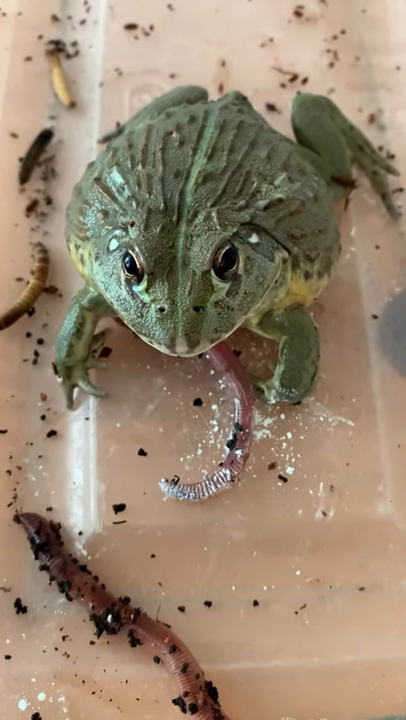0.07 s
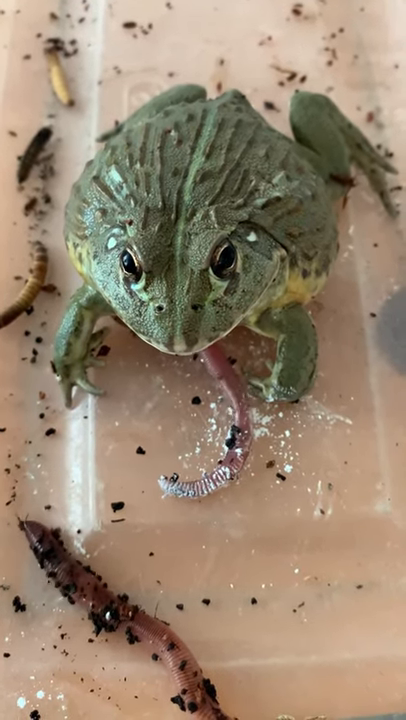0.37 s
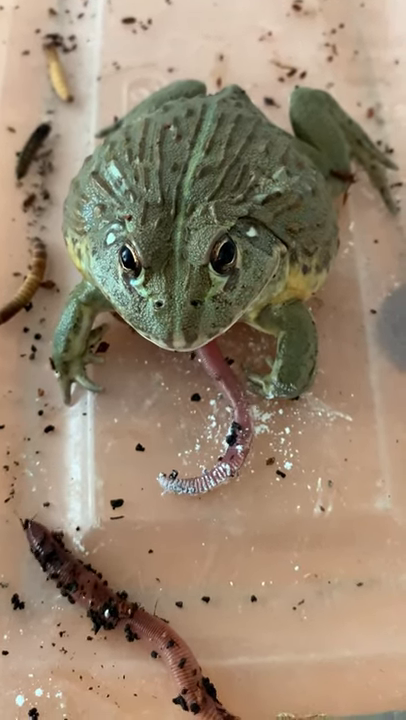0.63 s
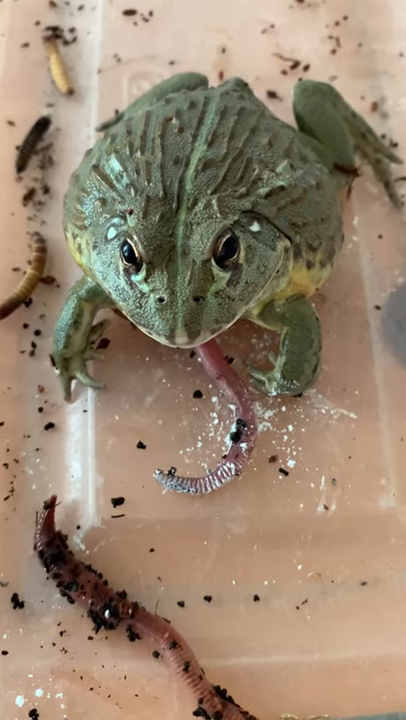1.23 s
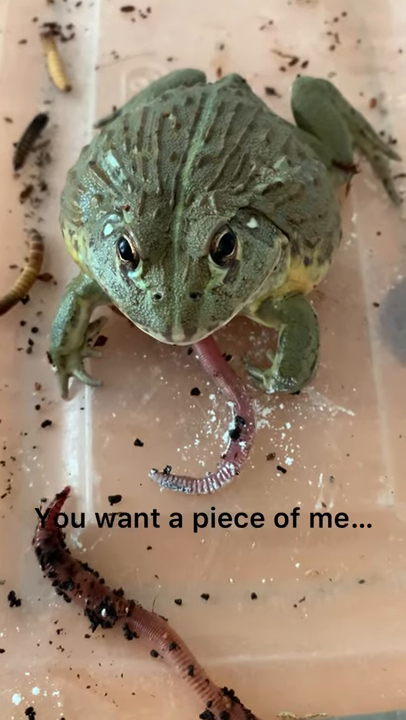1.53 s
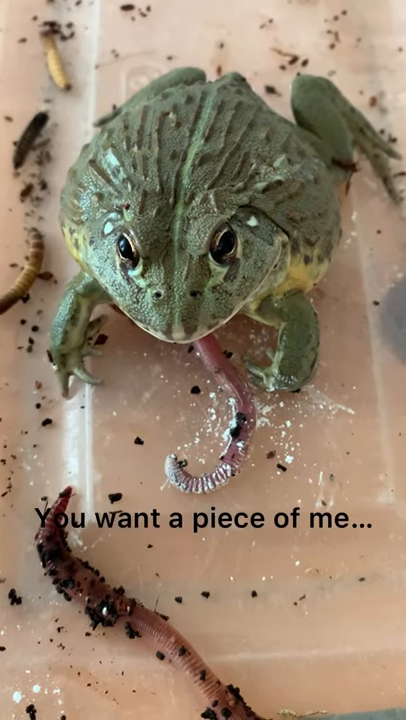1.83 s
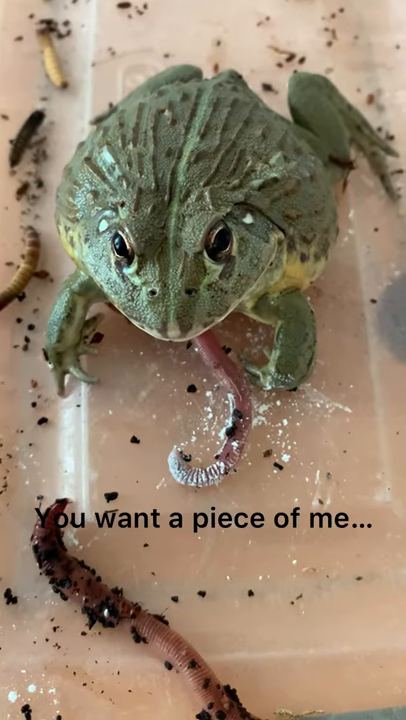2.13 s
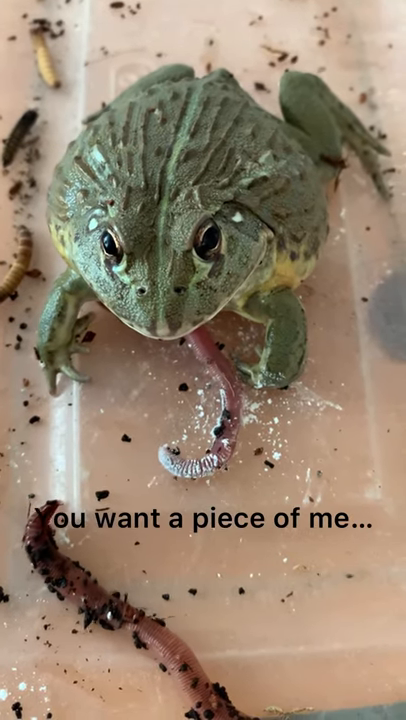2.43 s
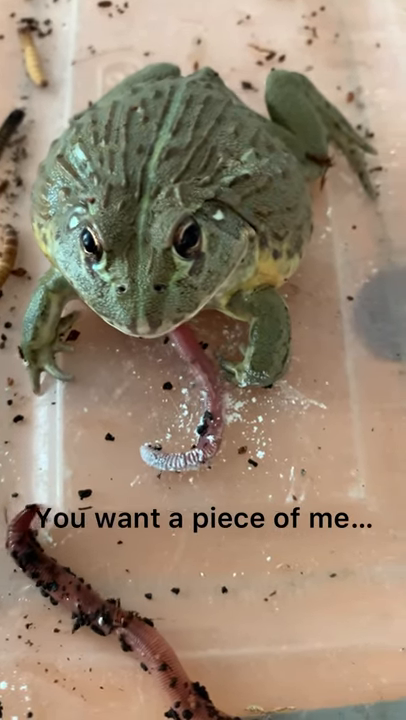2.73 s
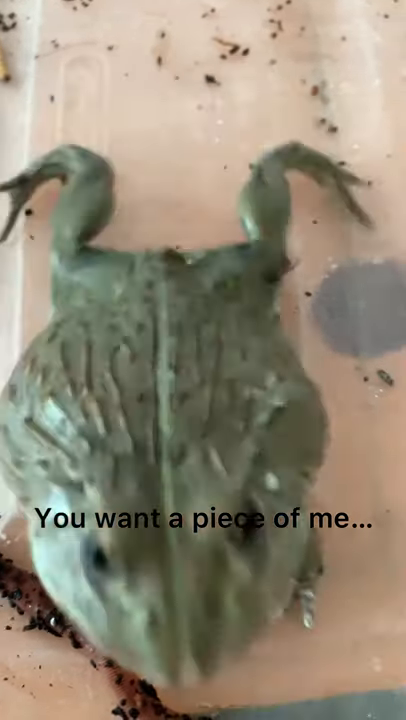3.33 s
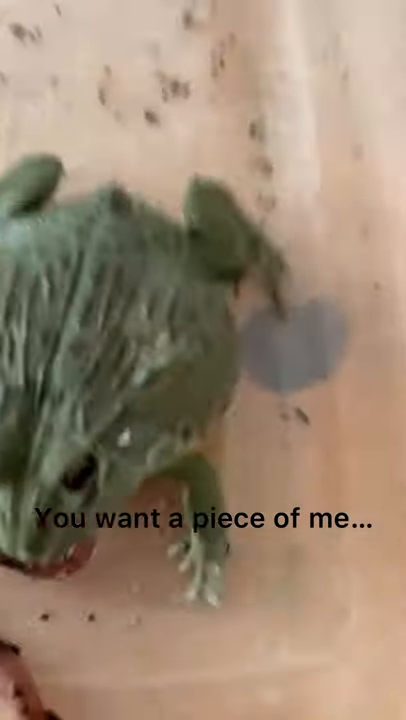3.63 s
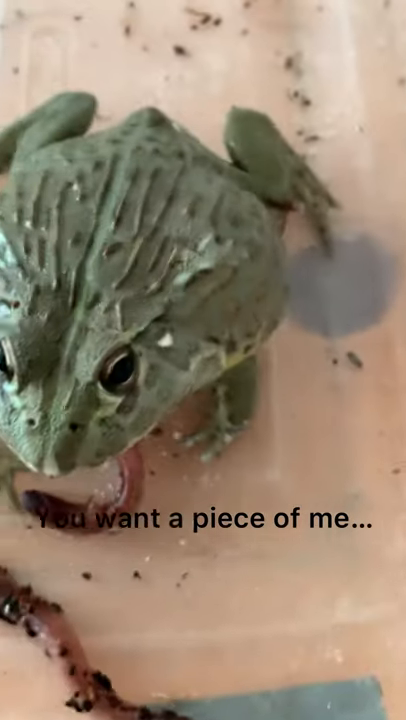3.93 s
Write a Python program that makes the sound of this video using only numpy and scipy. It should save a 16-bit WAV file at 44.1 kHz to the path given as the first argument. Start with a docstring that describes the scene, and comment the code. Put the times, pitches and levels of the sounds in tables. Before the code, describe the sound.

A frog lunges twice in a thin plastic tub, heard close up. Low room hum and faint rustles come first, then wet mouth clicks, two slapping, hollow thumps and skin scuffing over the damp floor.

```python
"""Frog lunging in a plastic tub

A big frog lunges twice in a thin tub, close up, in a quiet humming room. Soft rustles and small
squeaks come first. Its wet mouth clicks open, its body slaps the plastic and the tub floor booms and
rebounds under the weight. Around the blows, skin scuffs over the damp floor and peels off it."""
import sys
import numpy as np
from scipy import signal
from scipy.fft import rfft, irfft
from scipy.io import wavfile
from scipy.ndimage import uniform_filter1d

SR = 44100
rng = np.random.default_rng(int(sys.argv[2]) if len(sys.argv) > 2 else 0)


def master(y):
    """Save y as 16-bit WAV."""
    cut = np.clip(np.atleast_2d(y).T, -1, 1)
    pcm = np.round(cut * 32767)  # scale
    wavfile.write(sys.argv[1], SR, pcm.astype(np.int16))


N = 176400
T = np.arange(N) / SR
HZ = np.fft.rfftfreq(N, 1 / SR)


def amp(db):
    """Decibels to gain."""
    return 10 ** (np.asarray(db) / 20)


def unit_rms(x):
    """Scales to rms 1."""
    return x / np.sqrt(np.mean(x ** 2) + 1e-20)


def curve(points, hz=HZ):
    """Reads breakpoints on a log-frequency axis."""
    f, value = np.transpose(points)
    return np.interp(np.log(hz + 1), np.log(f + 1), value)


def noise(eq, grain_db=0):
    """Two unrelated EQ'd noises, optionally grainy; a fine random ripple gives a faintly tonal colour."""
    grain_gain = amp(grain_db * np.minimum(rng.exponential(1, N // 16 + 1), 5))
    grains = rng.standard_normal((2, N)) * grain_gain.repeat(16)[:N]
    ripple_axis = np.log1p(HZ / 1500) * 1500 / 27.99  # steps of about 28 Hz, wider in the treble
    ripple = np.interp(ripple_axis, np.arange(400), np.diff(rng.uniform(-1.5, 1.5, 401)))
    ripple_db = 3 * ripple * np.minimum(HZ / 600, 1)
    return unit_rms(irfft(rfft(grains) * amp(curve(eq) + ripple_db), N))


def swell(t, attack, decay):
    """Smooth attack, then exponential decay."""
    return np.sin(np.pi / 2 * np.clip(t / attack, 0, 1)) ** 2 * np.exp(-np.maximum(t - attack, 0) / decay)


def add(mix, start, sound):
    """Lays a sound into the mix at a time in seconds."""
    part = mix[..., round(start * SR):][..., :sound.shape[-1]]
    part += sound[..., :part.shape[-1]]


def pan(x, lag_ms, left_db):
    """Places a mono sound by shifting and trimming the left channel."""
    return np.array([amp(left_db) * np.interp(T - lag_ms / 1000, T, x), x])


def minimum_phase(gain):
    """Gives a gain curve the phase of something struck: it rings only after the blow."""
    cepstrum = irfft(np.log(gain + 1e-6), N)
    fold = np.r_[1, np.full(N // 2 - 1, 2), np.zeros(N // 2)]
    return np.exp(rfft(cepstrum * fold))


# Ventilation EQ: f/Hz, gain/dB
VENT_EQ = [(20, -18), (52, 5), (105, -3.5), (280, -2.5), (600, -2.5), (790, -5.5), (950, -20),
           (1300, -15.5), (1550, -22.5), (1830, -15.5), (2100, -25), (3300, -30), (5300, -41.5),
           (9500, -38.5), (16000, -64)]
# Stereo image of the air, centred in the lows: f/Hz, left-right correlation
VENT_CORRELATION = [(60, 0.96), (300, 0.82), (640, 0)]
# Machine hum: start t/s, end t/s, f/Hz, level/dB
MACHINE_HUMS = [(0, 0.397, 61.1, -64), (2.328, 3.114, 83.05, -60.5)]

def room_tone():
    """A steady bed of ventilation noise, with a faint machine hum that comes and goes."""
    shared, side = rfft(noise(VENT_EQ))
    same = np.clip(curve(VENT_CORRELATION), -1, 1)
    air = irfft(np.array([shared * amp(-1.3), same * shared + np.sqrt(1 - same ** 2) * side]), N)
    hum = np.zeros(N)
    for start, end, hz, db in MACHINE_HUMS:
        gate = np.clip(np.minimum(T - start, end - T) / 0.017, 0, 1)
        hum += amp(db) * np.sqrt(2) * np.sin(2 * np.pi * hz * T) * gate
    return amp(-54.5) * air + hum


# Dry rub EQ: f/Hz, gain/dB
RUB_EQ = [(200, 0), (3000, 9.5), (4300, 13), (5100, -1.5), (7500, -1), (10500, -23), (16000, -50)]
# Wet-film fizz EQ, shared with the scuffs: f/Hz, gain/dB
FIZZ_EQ = [(1500, -23), (4000, 4.5), (5400, 0), (7500, 7.5), (11500, -13.5), (16000, -10)]
# Soft strokes: t/s, attack/s, rub level/dB, fizz level/dB
RUSTLE_CUES = [(.06, 0.01, -70, -76), (1.785, 0.026, -88, -72.5), (1.88, 0.064, -67, -70.5),
               (2.12, 0.047, -66.5, -66), (2.415, 0.03, -74.5, -75), (2.55, 0.038, -68.5, -76.5),
               (3.018, 0.017, -51, -76)]

def rustles():
    """Faint rubbing before the lunge, each stroke with its own share of damp fizz."""
    rub, fizz = noise(RUB_EQ), noise(FIZZ_EQ, grain_db=2)
    return sum(swell(T - start, attack, decay=0.061) * (amp(rub_db) * rub + amp(fizz_db) * fizz)
               for start, attack, rub_db, fizz_db in RUSTLE_CUES)


# Small skin slips: t/s, length/s, f/Hz, level/dB
SQUEAK_CUES = [(0.447, 0.13, 3800, -68), (2.323, 0.033, 357, -45.5), (3.523, 0.023, 1294, -49)]

def squeaks():
    """Wet skin slips on the plastic in brief raspy tones whose pitch jitters every few cycles."""
    out = np.zeros(N)
    for start, length, hz, db in SQUEAK_CUES:
        t = np.arange(0, length, 1 / SR)
        jitter = unit_rms(uniform_filter1d(rng.standard_normal(SR // 2), size=round(2 * SR / hz)))
        pitch = hz * (1 + 0.075 * jitter[:len(t)])
        envelope = np.sin(np.pi * t / length) ** 2
        add(out, start, amp(db) * envelope * np.sin(2 * np.pi * np.cumsum(pitch) / SR))
    return pan(out, lag_ms=0.055, left_db=-4.0)


# Dull body of rubbed plastic: f/Hz, gain/dB
SCUFF_EQ = [(200, 6), (1250, -9.5), (2400, -12), (4200, -33), (5500, -58)]
# Resonances of rubbed plastic: f/Hz, width/Hz, gain/dB
RING_MODES = [(489, 29, 9), (1987, 55, -2), (3120, 150, -11.5), (4040, 310, -11)]
# The rings bend as the pressure on the plastic shifts: t/s, pitch ratio
RING_BEND = [(3.73, 0.98), (3.81, 0.97), (3.93, 1.025)]
# Slides on the damp floor: t/s, attack/s, decay/s, level/dB, fizz trim/dB, ring trim/dB
SCUFF_CUES = [(3.158, 0.041, 0.042, -42, -5.5, -19), (3.248, 0.091, 0.013, -41, -17, -29),
              (3.329, 0.02, 0.046, -43.5, 4.5, -14.5), (3.516, 0.06, 0.091, -53, 3.5, -10),
              (3.7, 0.044, 0.028, -37, -4.5, -6.5), (3.76, 0.0096, 0.39, -53, -30, -5.5),
              (3.887, 0.076, 0.45, -47, 0, -3)]

def scuffs():
    """Grainy sliding skin: a dull body and wavering rings from the plastic, a fizz from the wet film."""
    body = noise(SCUFF_EQ, grain_db=2)
    body = (body + 0.24 * body[::-1]) * amp([[-3], [0]])  # narrowed, leaning right
    fizz = amp(-12) * noise(FIZZ_EQ, grain_db=2)
    modes = sum(amp(db) / (1 + (2 * (HZ - hz) / width) ** 2) for hz, width, db in RING_MODES)
    steady_rings = irfft(rfft(rng.standard_normal((2, N))) * modes, N)
    varispeed = np.cumsum(np.interp(T, *np.transpose(RING_BEND))) / SR
    rings = unit_rms(np.array([np.interp(varispeed % T[-1], T, side) for side in steady_rings]))
    return sum(amp(db) * swell(T - start, attack, decay)
               * (body + amp(fizz_db) * fizz + amp(ring_db) * rings)
               for start, attack, decay, db, fizz_db, ring_db in SCUFF_CUES)


# Sticky crackle EQ: f/Hz, gain/dB
CRACKLE_EQ = [(700, -60), (1250, 3.5), (1600, -6), (2600, -2.5), (3600, -14), (12000, -32)]
# Skin lifting off the floor: t/s, attack/s, decay/s, level/dB
PEEL_CUES = [(3.17, 0.039, 0.019, -47), (3.251, 0.019, 0.013, -41.5), (3.34, 0.03, 0.0044, -43)]

def peeling(snaps_per_s=1000):
    """Many tiny sticky contacts let go one by one."""
    snaps = rng.standard_normal(N) * (rng.random(N) < snaps_per_s / SR)
    crackle = unit_rms(irfft(rfft(snaps) * amp(curve(CRACKLE_EQ)), N))
    envelope = sum(amp(db) * swell(T - start, attack, decay) for start, attack, decay, db in PEEL_CUES)
    return pan(crackle * envelope, lag_ms=0.099, left_db=-7.0)


# Bright click EQ: f/Hz, gain/dB
CLICK_EQ = [(2000, 2), (5000, -5), (7000, -3.5), (15000, 1.5)]
# Mouth, tongue and skin clicks: t/s, level/dB, decay/s, low-pass f/Hz
CLICK_CUES = [(3.2123, -31, 0.0032, 16400), (3.222, -43, 0.0096, 15800), (3.242, -41.5, 0.004, 12000),
              (3.3276, -33, 0.0031, 16000), (3.3323, -31.5, 0.0014, 4050), (3.39, -38, 0.0017, 5000),
              (3.461, -52, 0.01, 10700), (3.503, -40, 0.0014, 5700), (3.552, -53, 0.0073, 6760),
              (3.687, -26, 0.0053, 6700)]

def wet_clicks():
    """Wet skin snaps free in bright cracks with a hard attack and a tight tail."""
    crack = noise(CLICK_EQ)
    spectrum = 0
    for start, db, decay, cutoff in CLICK_CUES:
        envelope = amp(db) * (T > start) * np.exp(-((T - start) / decay) ** 2)
        low_pass = 1 / (1 + 1j * np.sqrt(2) * HZ / cutoff - (HZ / cutoff) ** 2)
        spectrum += rfft(envelope * crack) * low_pass
    mid, side = irfft(spectrum, N)
    return pan(mid, lag_ms=-0.12, left_db=-1) + 0.073 * np.array([side, -side])


# Tub wall modes: f/Hz, gain/dB, t60/s
WALL_RINGS = [(181.4, -8.5, 0.081), (304, -13.5, 0.051), (350.6, -12.5, 0.052), (480, -10.5, 0.076),
              (530.6, -16.5, 0.082), (887, -0.5, 0.013), (1030, 0.5, 0.0055), (1130, -13.5, 0.021),
              (1310, -13.5, 0.036), (1450, -18, 0.034), (1685, -9, 0.015), (1815, -23, 0.082),
              (2210, -20, 0.025), (3170, -6, 0.002)]
# Left-channel EQ of the walls: f/Hz, gain/dB
WALL_LEFT_EQ = [(330, -2), (1200, -7)]
# Skin hits on the plastic: t/s, level/dB, low-pass f/Hz
SLAP_CUES = [(3.256, -33, 1500), (3.3277, -15.5, 250), (3.3349, -9, 920), (3.392, -37.5, 583),
             (3.438, -38.5, 1000), (3.6902, -2, 1510), (3.746, -18, 890), (3.831, -25, 1000)]

def wall_slaps(mode_widening=1.36, travel_s_at_1khz=0.00106):
    """Each slap rings the damped walls; softer contact leaves out the high modes."""
    peaks = []
    for hz, db, t60 in WALL_RINGS:
        decay = t60 / np.log(1000)
        detune = 2 * np.pi * (HZ - hz) * decay / mode_widening
        peaks.append(amp(db) * decay * SR / 2 / (1 + detune ** 2))
    walls = minimum_phase(np.linalg.norm(peaks, axis=0))
    hits = sum(amp(db) * np.exp(-2j * np.pi * HZ * start) / (1 + 1j * HZ / cutoff)
               for start, db, cutoff in SLAP_CUES)
    dispersion = 4 * np.pi * np.sqrt(1000 * HZ) * travel_s_at_1khz  # low bending waves arrive late
    right = hits * walls * np.exp(-1j * dispersion)
    left = right * amp(curve(WALL_LEFT_EQ)) * np.exp(-1.4j)  # trails by 1.4 radians
    return irfft(np.array([left, right]), N)


# Tub floor modes, relative to each thump: pitch ratio, gain/dB, t60 ratio
FLOOR_RINGS = [(0.443, -16.5, 6.6), (.68, 9, 0.55), (1, 10.5, 1), (1.659, -5, 0.84)]
# Weight landing on the floor: t/s, f/Hz, level/dB, attack/s, t60/s
THUMP_CUES = [(3.257, 120.7, -44.5, 0.0095, 0.85), (3.341, 88.2, -7, 0.0098, 0.089),
              (3.403, 78.2, -14, 0.0087, 0.049), (3.495, 62.5, -25.5, 0.016, 0.064),
              (3.6911, 106.8, -15, 0.0089, 0.24), (3.838, 95, -20.5, 0.0086, 0.081),
              (3.975, 117, -17, 0.011, 0.062)]

def floor_thumps(stretch=0.56, relax_s=0.0035):
    """The tub floor booms at a pitch set by where the frog's weight lies."""
    out, t = np.zeros(N), np.arange(SR // 2) / SR
    clock = t + stretch * relax_s * (1 - np.exp(-t / relax_s))  # the stretched floor starts sharp
    for start, hz, db, attack, t60 in THUMP_CUES:
        boom = sum(amp(mode_db - 60 * t / (t60 * t60_ratio)) * np.sin(2 * np.pi * hz * ratio * clock)
                   for ratio, mode_db, t60_ratio in FLOOR_RINGS)
        add(out, start, amp(db) * np.minimum(t / attack, 1) ** 2 * boom)
    return pan(out, lag_ms=0.88, left_db=-1.5)


# Room decay: f/Hz, t60/s
REVERB_T60 = [(100, 0.74), (500, 0.12), (2000, 0.18)]

def room_reverb(send):
    """Diffuse tail of a small room, dying at its own speed in each band."""
    hz, t, bands = signal.stft(rng.standard_normal((2, SR // 2)), SR, nperseg=256)
    envelope = amp(-60 * t / curve(REVERB_T60, hz)[:, None]) * np.clip(t / 0.0027, 0, 1)
    tail = signal.istft(bands * envelope, SR, nperseg=256)[1]
    return signal.fftconvolve(send, tail / np.linalg.norm(tail[0]), axes=1)[:, :N]


def scene():
    """The frog in its tub over the room tone; only clicks and slaps feed the reverb."""
    bed = room_tone()
    skin = rustles() + squeaks() + scuffs() + peeling()
    clicks, slaps = wet_clicks(), wall_slaps()
    reverb = room_reverb(amp(-11) * clicks + amp(-15) * slaps)
    return bed + skin + clicks + slaps + floor_thumps() + reverb


def record(dry):
    """A low cut at 38 Hz and a steep high cut at 15.9 kHz."""
    low_cut = signal.butter(4, 38, "high", fs=SR, output="sos")
    high_cut = signal.firwin(511, 15900, window=("kaiser", 9), fs=SR)
    return signal.oaconvolve(signal.sosfilt(low_cut, dry), high_cut[None], "same")


dry = scene()
out = record(dry)
master(out)
```